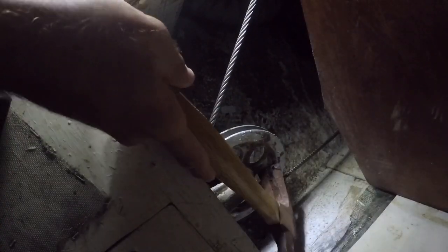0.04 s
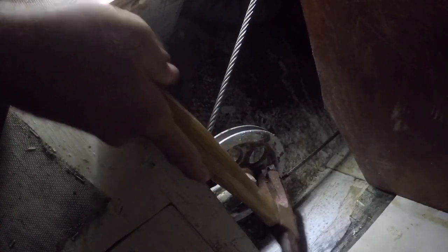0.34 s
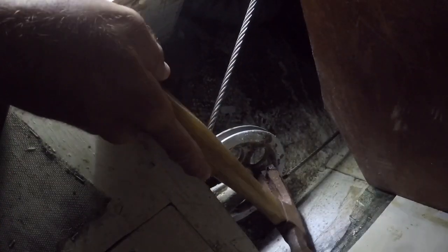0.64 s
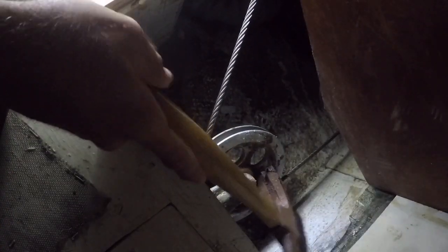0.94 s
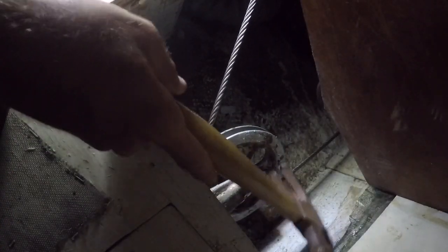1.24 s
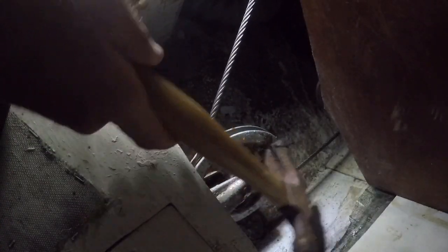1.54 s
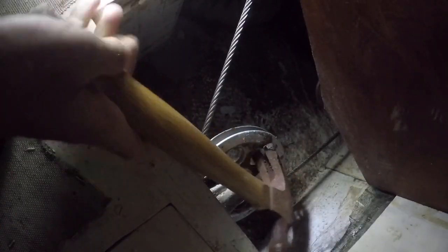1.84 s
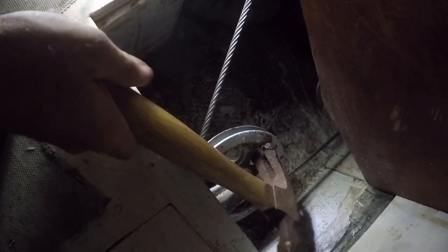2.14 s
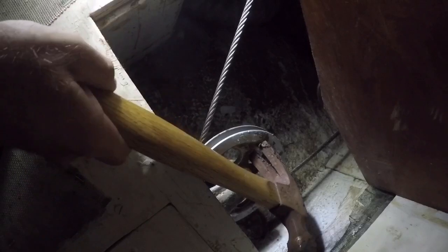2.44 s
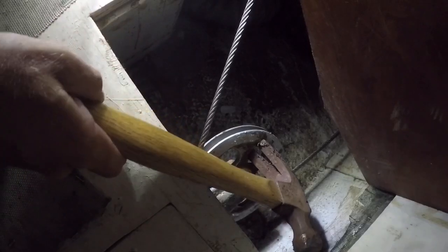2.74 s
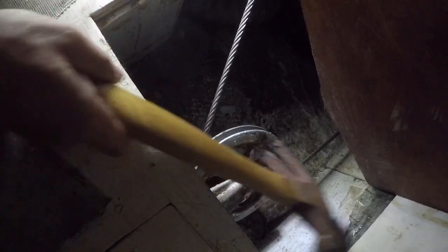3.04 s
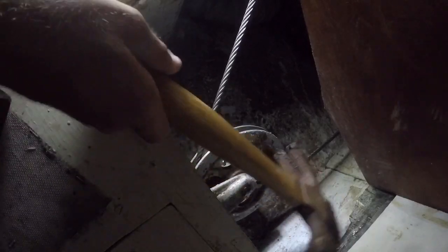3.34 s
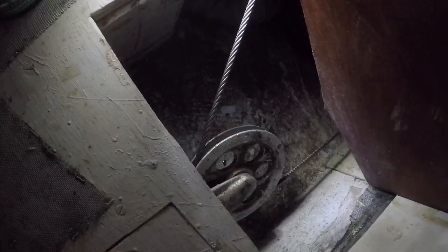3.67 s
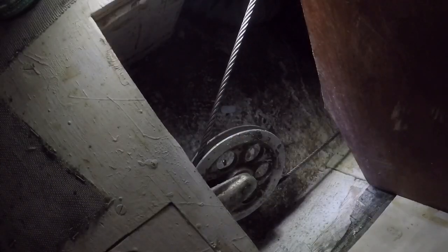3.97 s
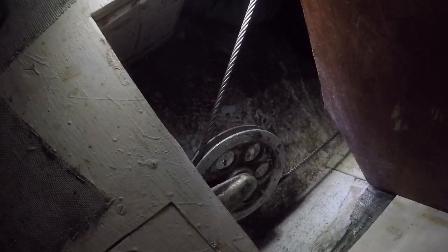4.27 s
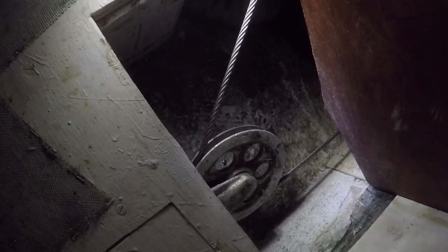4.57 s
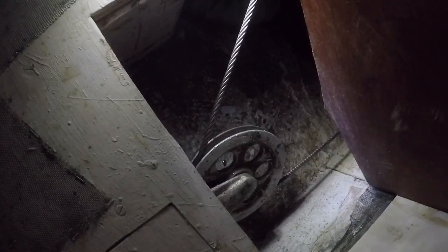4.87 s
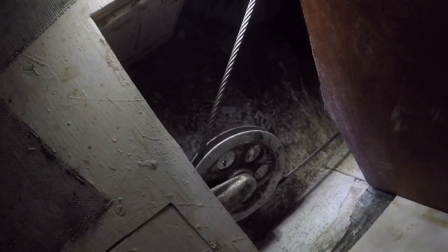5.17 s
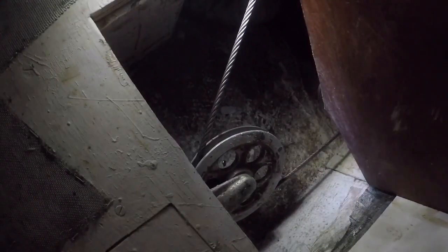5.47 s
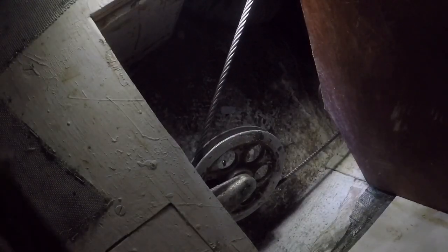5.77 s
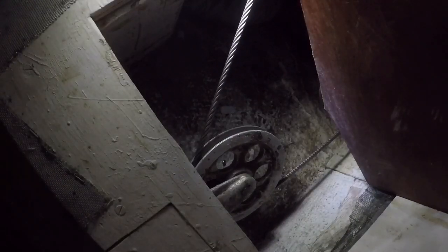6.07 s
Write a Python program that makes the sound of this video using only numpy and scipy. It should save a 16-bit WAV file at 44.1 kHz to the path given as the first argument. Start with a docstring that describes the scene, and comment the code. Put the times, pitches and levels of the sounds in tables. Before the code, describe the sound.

Irregular knocks, clicks and ringing metal clanks as a hammer and steel cable work a pulley below a boat's deck, ending in a wire rasp.

```python
"""Below deck on a boat, a steel steering cable and its pulley are worked close to a small stereo microphone.
Over the soft rumble of the hull, knocks boom in the wooden deck while a hammer is held to the pulley.
A dry contact squeaks by stick-slip, the cable is tugged, the hammer lifts and the sound cuts out briefly.
Then the steel wheel clanks and rings in its modes, amid short pulls, axle creaks and more knocks.
Last comes one long haul, the wire strands rasping over the pulley and shaking the deck."""
import sys
import numpy as np
from scipy import signal
from scipy.fft import rfft, irfft, next_fast_len
from scipy.io import wavfile
from scipy.ndimage import uniform_filter1d

SR = 44100
rng = np.random.default_rng(int(sys.argv[2]) if len(sys.argv) > 2 else 0)


def wav_record(signal):
    """Record a signal, one row per channel, as 16-bit PCM in the file named by sys.argv[1]."""
    frames = np.transpose(np.atleast_2d(signal))
    bounded = np.clip(frames, -1, 1)
    # unit amplitude maps onto the largest positive 16-bit level
    quanta = np.round(bounded * 32767).astype(np.int16)
    wavfile.write(sys.argv[1], SR, quanta)


N = 278271
TIME = np.arange(N) / SR
RING_TIME = TIME[:SR]
TOP_HZ = 15800
HAMMER_LIFTS_S = 3.3

# Modes of the deck and of the pulley mount. Each row: frequency in Hz, level in dB, t60 in seconds.
DECK_MODES = [(151.9, -1.5, 0.23), (185.4, 4.5, 0.092), (233, 4, 0.13)]
MOUNT_MODES = [(308.5, 2, 0.12), (369.3, -10, 0.16)]
# Spectrum of steel striking steel. Each row: frequency in Hz, spectral density in dB.
CRASH_SPECTRUM = [(290, -16), (500, -4), (610, -9.5), (823, -4.5), (962, 2), (1390, -3), (1750, 1),
                  (1960, -11), (3230, -6), (4050, -21), (4290, -20), (6120, -18), (15000, -48.5)]


def undb(db):
    """Decibels to amplitude ratio."""
    return 10 ** (np.asarray(db) / 20)


def unit(x):
    """Normalise to rms 1."""
    return x / np.sqrt(np.mean(x ** 2))


def add(out, s, x):
    """Superposition: mix x in at s seconds."""
    i = int(s * SR)
    out[:, i:i + x.shape[1]] += x[:, :N - i]


def colour(x, points):
    """Zero-phase filtering by a curve of (Hz, dB) points."""
    hz, db = np.transpose(points)
    size = next_fast_len(x.shape[-1])
    f = np.maximum(np.fft.rfftfreq(size, 1 / SR), 1)
    gain = undb(np.interp(np.log(f), np.log(hz), db))
    return irfft(rfft(x, size) * gain, size)[..., :x.shape[-1]]


def noise(points, size):
    """Two uncorrelated coloured noises: the direct sound and its scatter round the bilge."""
    return unit(colour(rng.standard_normal((2, size)), points))


def walk(rate_hz):
    """Smooth random modulation with a spread near 1."""
    k = int(SR / rate_hz)
    steps = np.repeat(rng.standard_normal(N // k + 2), k)
    return 1.1 * uniform_filter1d(uniform_filter1d(steps, k), k)[:N]


def fade(t60, rise, t=RING_TIME):
    """Envelope of a damped vibration: quick rise, exponential decay, both times in seconds."""
    return (1 - np.exp(-t / max(rise, 1 / SR))) * np.exp(-np.log(1000) * t / max(t60, 1 / SR))


def ring(modes, rise, detune, echo_s=0.001037, stray_rad=0.53):
    """Free vibration of modes retuned by the load, direct and reflected off the nearest board."""
    out = 0
    for (hz, db, t60), (load, path) in zip(modes, rng.standard_normal((len(modes), 2))):
        omega = 2 * np.pi * hz * (1 + detune * load)
        phases = [omega * RING_TIME, omega * (RING_TIME - echo_s) + stray_rad * path]
        out = out + undb(db) * fade(t60, rise) * np.sin(phases)
    return out


def burst(points, t60, rise, tail_db, tail_t60):
    """Overlapping modes decay as noise, with a reverberant tail in the bilge."""
    t = RING_TIME[:SR // 2]
    return noise(points, len(t)) * (fade(t60, rise, t) + undb(tail_db) * fade(tail_t60, rise, t))


def peaked(points, hz, boost_db, octaves):
    """Resonance: a hump in the spectrum where a contact rings most."""
    grid = np.geomspace(100, TOP_HZ, num=60)
    known_hz, db = np.transpose(points)
    hump = boost_db * np.exp(-(np.log2(grid / hz) / octaves) ** 2)
    return np.column_stack([grid, np.interp(np.log(grid), np.log(known_hz), db) + hump])


def hardened(points, hz, knee_hz=4800, slope_db=5):
    """Contact stiffness: a harder, higher tick reaches further into the top octaves."""
    tilt_db = slope_db * np.log2(hz / knee_hz)
    return [(f, db + tilt_db * max(np.log2(f / knee_hz), 0)) for f, db in points]


def favoured(modes, centre_hz, db_per_octave):
    """Selective excitation: the spot struck favours the modes near one frequency."""
    return [(hz, db - db_per_octave * abs(np.log2(hz / centre_hz)), t60) for hz, db, t60 in modes]


def slips(per_s=3200, spread_db=3.8):
    """Friction as shot noise: tiny slips of uneven size, direct and scattered."""
    when = rng.random(N) < per_s / SR
    size = undb(spread_db * np.minimum(rng.exponential(size=N), 3))
    return unit(when * size * rng.choice([-1, 1], (2, N)))


def pull(length, build_db, attack_s=0.003, release_t60=0.087):
    """Envelope of sliding friction: it grows as tension builds, then decays on release."""
    t = RING_TIME
    tension_db = build_db * (np.minimum(t / length, 1) - 1)
    release = np.exp(-np.log(1000) * np.maximum(t - length, 0) / release_t60)
    return (1 - np.exp(-t / attack_s)) * undb(tension_db) * release


def rubbed(modes, force):
    """Forced vibration: slips convolved with the impulse response of the modes."""
    response = unit(ring(modes, rise=0.00077, detune=0.0006)) / np.sqrt(SR)
    return signal.fftconvolve(slips()[:1] * force, response, axes=1)[:, :N]


def hull():
    """Modulated noise bands: rumble, hollow murmur and faint hiss; one damped low mode thuds."""
    # Spectrum of the hull. Each row: frequency in Hz, spectral density in dB.
    spectrum = [(12, -37), (20, -3), (87, -5), (328, -15), (398, -26), (571, -25.5), (818, -29),
                (1020, -26.5), (1510, -31.5), (1730, -31.5), (4310, -39.5), (7300, -40.5), (10200, -46),
                (13100, -54.5), (15000, -71)]
    # Contours of rumble and murmur. Each row: time in seconds, relative level in dB.
    rumble_levels = [(0.0, -48.5), (0.84, -38), (1.44, -42.5), (1.67, -35), (2.74, -40.5), (3.22, -41.5),
                     (3.4, -47), (3.47, -70), (3.76, -67), (4.02, -50), (4.59, -53.5), (5.01, -40.5),
                     (6.12, -46.5), (6.31, -40.5)]
    murmur_levels = [(0, -40.5), (1.2, -39), (2.4, -45), (3.3, -42.5), (3.9, -40.5), (4.2, -39.5),
                     (4.9, -41), (5.35, -43.5), (6.31, -42)]
    bands = [signal.butter(4, edges_hz, "bandpass", fs=SR, output="sos")
             for edges_hz in [(18, 110), (125, 650), (650, 15000)]]
    rumble, murmur, hiss = (unit(signal.sosfilt(band, noise(spectrum, N))) for band in bands)
    dip_db = np.interp(TIME, [1.19, 2.19], [8, 0], left=0)  # the hiss dips once and creeps back
    out = (rumble * undb(np.interp(TIME, *np.transpose(rumble_levels)) + 4.5 + 1.96 * walk(14))
           + murmur * undb(np.interp(TIME, *np.transpose(murmur_levels)) + 3 * walk(18))
           + hiss * undb(-53.5 - dip_db + walk(37)))
    thud = ring([(75, -7, 0.071)], rise=0.0052, detune=0.02)
    add(out, 0.8, thud)
    return out


def handling(ticks_per_s=14, spread_db=4, level_db=-50):
    """Random light impacts: the hammer shifts with dry ticks while it is held in place."""
    out = np.zeros((2, N))
    for when, size in rng.random((int(ticks_per_s * HAMMER_LIFTS_S), 2)):
        tick = burst(CRASH_SPECTRUM, 0.067, rise=0.00089, tail_db=-5, tail_t60=0.24)
        add(out, when * HAMMER_LIFTS_S, undb(level_db + spread_db * (2 * size - 1.5)) * tick)
    return out


def creaks(overtone_db_per_octave=-21):
    """Brief slips of the axle sound gliding harmonic notes, broadened by random phase drift."""
    # Each row: centre time in seconds, pitch in Hz, glide in Hz per second, linewidth in Hz,
    # length in seconds, level in dB.
    axle_slips = [(0.345, 5500, 0, 380, 0.024, -43), (0.463, 1140, -4, 19, 0.016, -40),
                  (0.729, 1470, 0, 400, 0.012, -42), (1.041, 1170, 30000, 320, 0.0088, -32),
                  (1.542, 1144, 0, 710, 0.016, -32.5), (3.96, 973, -900, 10, 0.015, -21),
                  (4.109, 967, -900, 13, 0.022, -21.5), (4.84, 607, 12996, 81, 0.023, -33),
                  (5.06, 553, 8000, 170, 0.032, -42.5), (5.206, 1013, -4000, 18, 0.018, -37),
                  (5.228, 1214, 7000, 140, 0.019, -44), (6.2, 4370, -2, 160, 0.019, -39)]
    out = np.zeros((2, N))
    for s, hz, glide, width_hz, length, db in axle_slips:
        t = np.arange(-2 * length, 2 * length, 1 / SR)
        drift = np.cumsum(rng.standard_normal(len(t))) * np.sqrt(np.pi * width_hz / SR)
        phase = 2 * np.pi * (hz + glide * t / 2) * t + uniform_filter1d(drift, size=24)
        note = sum(undb(overtone_db_per_octave * np.log2(k)) * np.sin([k * phase, k * (phase + 1)])
                   for k in range(1, 4))
        add(out, s - 2 * length, undb(db) * np.exp(-2 * (t / length) ** 2) * note)
    return out


def scrapes():
    """Sliding friction: the hammer head rasps dryly on the rim."""
    # Each row: start in seconds, length in seconds, final level in dB, build-up in dB.
    slides = [(0.308, 0.011, -40, 10), (1.047, 0.032, -36, 4), (1.084, 0.018, -26, 4),
              (2.332, 0.019, -39, 8)]
    # Spectrum of the rasp. Each row: frequency in Hz, spectral density in dB.
    spectrum = [(300, -5), (450, -7), (590, 8.5), (720, -9), (1100, -1), (2300, -2.5), (3300, 1.5),
                (5800, -2), (7500, -6), (9500, -18), (11500, -24), (15000, -30)]
    force = np.zeros((1, N))
    for start, length, db, build_db in slides:
        add(force, start, undb([[db]]) * pull(length, build_db))
    return force * unit(colour(slips(), spectrum))


def squeak(smooth_hz=2500, jitter=0.027, attack_s=0.0054, release_s=0.062):
    """Stick-slip oscillation: as the rubbing slows, the pitch sinks and the note grows rough."""
    # Pitch contour. Each row: time in seconds, slip rate in Hz.
    slip_rates = [(2.68, 2740), (2.692, 2690), (2.706, 2900), (2.716, 2650), (2.724, 2330), (2.741, 2050),
                  (2.752, 2130), (2.762, 2400), (2.774, 2480), (2.797, 1690), (2.83, 1000), (2.86, 750)]
    # Response of the rubbed body. Each row: frequency in Hz, gain in dB.
    body = [(500, -8), (1100, 8), (2300, 0), (3600, 4.5), (4300, 2.5), (5000, -4), (5400, 6.5), (5800, -11),
            (6250, 10.5), (6900, 3.5), (7500, -12), (8200, -4.5), (8700, -15), (14000, -54)]
    s, hz = np.transpose(slip_rates)
    rate = np.interp(TIME, s, hz)
    rough = (smooth_hz / rate) ** 2
    phase = 2 * np.pi * np.cumsum(rate * (1 + jitter * rough * walk(900))) / SR
    harmonics = sum(np.sin([k * phase, k * (phase + 1)]) * (k * rate < TOP_HZ) for k in range(1, 8))
    rasp = undb(-11.5) * np.minimum(rough, 3) * noise(body, N)
    envelope = np.clip((TIME - s[0]) / attack_s, 0, 1) * np.clip((s[-1] - TIME) / release_s, 0, 1) ** 2
    return (colour(harmonics, body) + rasp) * envelope * undb(-40.5 + 4.2 * walk(230))


def bracket():
    """Impulse response: a square blow leaves the pulley's bracket ringing with a hollow clonk."""
    # Each row: start in seconds, level in dB.
    blows = [(0.7713, -19), (1.88, -24)]
    # Each row: frequency in Hz, level in dB, t60 in seconds.
    modes = [(308.6, -6, 0.28), (457, -3, 0.15), (647, 4.5, 0.087), (1080, -9, 0.14), (1630, -26, 0.31)]
    out = np.zeros((2, N))
    for s, db in blows:
        add(out, s, undb(db) * ring(modes, rise=0.00072, detune=0.0018))
    return out


def knocks(cut_hz=122):
    """Impact excitation: each contact ticks and clacks, and drives the modes of mount, boards and deck."""
    # Each row: start in seconds, deck level in dB and centre in Hz, mount level in dB,
    # clack level in dB and centre in Hz, tick level in dB and centre in Hz. Levels are relative.
    blows = [(0.319, -22.5, 227, -23, -20, 560, -37, 3180),
             (0.329, -16.5, 202, -21.5, -16.5, 526, -36, 2200),
             (0.378, -27.5, 174, -37, -34, 500, -45.5, 2900),
             (0.77, -28, 167, -24.5, -18, 526, -43.5, 4050), (0.796, -30.5, 157, -30, -32, 660, -68, 2500),
             (0.9835, -43, 176, -36, -31, 990, -31.5, 5370), (0.987, -20, 173, -30, -18.5, 600, -32, 2760),
             (1.1651, -16, 213, -15, -17, 800, -28.5, 3430),
             (1.237, -26, 200, -21, -28.5, 755, -51.5, 4070),
             (1.3, -24, 171, -17.5, -28.5, 455, -45.5, 5300), (1.458, -21, 160, -17, -20.5, 560, -32, 4700),
             (1.558, -19, 145, -17.5, -23, 750, -35.5, 5170), (1.602, -21, 149, -22, -29.5, 660, -45, 5200),
             (1.623, -33, 160, -30, -26.5, 520, -43, 5400), (1.649, -24, 168, -20, -25, 1030, -45.5, 4360),
             (1.707, -30.5, 163, -45, -59, 1600, -53, 4200),
             (1.855, -17.5, 174, -24, -17.5, 750, -43, 1700),
             (1.878, -18.5, 158, -22.5, -16, 1400, -37, 2000),
             (1.887, -18.5, 161, -23.5, -15.5, 710, -37, 4130), (1.964, -30, 206, -45, -24, 665, -55, 2220),
             (2.349, -21.5, 170, -29, -26.5, 574, -45, 4020),
             (2.364, -24.5, 163, -36, -35, 543, -29.5, 6400), (2.42, -30, 198, -43, -30.5, 660, -25, 6800),
             (3.4837, -28, 215, -38, -48, 1700, -23.5, 5100), (3.519, -16, 161, -30, -27.5, 990, -20, 7800),
             (4.017, -40, 240, -35, -45, 506, -64, 2410), (4.457, -28, 152, -53, -50, 910, -59, 2500),
             (4.6315, -13, 187, -29, -26, 820, -25, 4250), (4.6717, -26, 171, -35, -31, 1300, -30.5, 4620),
             (4.674, -13, 184, -20.5, -24, 516, -31, 3500), (4.7246, -18.5, 197, -32, -38, 576, -37, 1700),
             (4.746, -29, 186, -36, -37, 1600, -28.5, 4170),
             (4.7549, -14.5, 174.5, -27, -34.5, 570, -30, 3000),
             (4.794, -29, 163, -32, -38.5, 1610, -38, 1750),
             (4.823, -32, 186, -36, -39.5, 1650, -36.5, 1700),
             (5.54, -28, 173, -43, -30.5, 1730, -12.5, 5900),
             (5.559, -43, 179, -45, -36, 1750, -16.5, 9800),
             (5.59, -23.5, 160, -24, -26.5, 1070, -18, 4630), (5.627, -28, 174, -39, -35, 1100, -33, 3400),
             (5.644, -30, 176, -44, -26.5, 1140, -13, 7200),
             (5.6534, -14.5, 184.6, -34, -45, 1100, -11.5, 3400),
             (5.6865, -29, 172, -37, -29.5, 1100, -23.5, 7400),
             (5.709, -20.5, 217, -23, -25.5, 1140, -18, 2600),
             (5.719, -26, 200, -32, -30.5, 1200, -20, 6900), (5.876, -34, 180, -43, -37, 1750, -27, 5500),
             (6.009, -55, 238, -64, -48, 1020, -36.5, 2560),
             (6.059, -37.5, 173, -53, -60, 1000, -44.5, 5700),
             (6.194, -47, 181, -61, -52, 1010, -34.5, 4280)]
    # Spectra of the hard tick and wooden clack. Each row: frequency in Hz, spectral density in dB.
    tick_spectrum = [(700, -20), (1700, -2.5), (3300, 5), (4600, 0), (5600, 4.5), (7200, -1), (9000, -10),
                     (12000, -18.5), (16000, -30)]
    clack_spectrum = [(200, -16), (400, 9.5), (520, -1), (680, -6.5), (850, -13), (1050, -0.5), (1380, -13),
                      (1700, -10.5), (2600, -17), (6000, -62)]
    # Hollow notes of the boards, and the deck's first shove.
    # Each row: frequency in Hz, level in dB, t60 in seconds.
    board_modes = [(453, -1, 0.12), (527, 3.5, 0.076), (668, -4, 0.052), (742, -5.5, 0.075),
                   (980, -8.5, 0.11), (987, -11, 0.039), (1110, -5, 0.062), (1260, -12, 0.062),
                   (1560, 0.5, 0.062), (1834, 4, 0.032), (2135, 1, 0.04), (2530, 1, 0.051)]
    shove_modes = [(276, 0, 0.019), (428, -6.5, 0.015)]
    out = np.zeros((2, N))
    for s, deck_db, deck_hz, mount_db, clack_db, clack_hz, tick_db, tick_hz in blows:
        # the resting hammer damps the clack and leaves no tail
        tick_t60, clack_t60, tail_t60 = (0.043, 0.0151, 0) if s < HAMMER_LIFTS_S else (0.0084, 0.19, 0.22)
        tick = hardened(peaked(tick_spectrum, tick_hz, boost_db=9, octaves=0.22), tick_hz)
        clack = peaked(clack_spectrum, clack_hz, boost_db=7, octaves=0.46)
        boards = favoured(board_modes, clack_hz, db_per_octave=11)
        deck = favoured(DECK_MODES, deck_hz, db_per_octave=22)
        tail = dict(tail_db=-15, tail_t60=tail_t60)
        add(out, s, undb(tick_db + 5) * burst(tick, tick_t60, rise=0.00037, **tail))
        add(out, s, undb(clack_db + 3.5) * burst(clack, clack_t60, rise=0.00083, **tail))
        add(out, s, undb(clack_db) * ring(boards, rise=0.0013, detune=0.033))
        add(out, s + 0.0012, undb(mount_db + 8) * ring(MOUNT_MODES, rise=0.0073, detune=0.04))
        add(out, s + 0.00094, undb(deck_db + 6.5) * ring(shove_modes, rise=0.00063, detune=0.032))
        add(out, s + 0.0019, undb(deck_db + 6.5) * ring(deck, rise=0.0033, detune=0.05))
    # the knocks carry little deep bass
    return signal.sosfilt(signal.butter(5, cut_hz, "highpass", fs=SR, output="sos"), out)


def clanks():
    """Modal ringing of struck steel: a crash, a groove note and a ring weighted by the point of impact."""
    # Each row: start in seconds, relative groove and wheel levels in dB, place from 0 (rim)
    # to 1 (groove), crash level in dB, crash t60 in seconds.
    blows = [(3.4831, -25, -23.5, 0.24, -18.5, 0.26), (3.519, -24, -24.5, 0.085, -33, 0.34),
             (3.827, -24.5, -33, 0.79, -34.5, 0.09), (3.844, -21.5, -28, 1, -29, 0.17),
             (3.945, -30, -42.5, 0.97, -41.5, 0.46), (4.094, -23.5, -41, 0.98, -38, 0.25),
             (4.163, -29.5, -40.5, 0.42, -42, 0.18), (4.223, -29, -41, 0.3, -50, 0.12),
             (4.271, -52, -43.5, 0.28, -43, 0.092), (4.33, -46, -64, 0.99, -35.5, 0.042),
             (4.3627, -25, -33.5, 0.73, -29.5, 0.12), (4.436, -53, -59, 0.16, -40, 0.074)]
    # Each row: frequency in Hz, t60 in seconds, levels in dB when struck on the rim and in the groove.
    wheel_modes = [(774, .35, -4, -12), (1063, .5, -9, -11), (1138, .28, -1, -7), (1236, .3, 1, -10),
                   (1329, .6, -9, -11), (1385, .12, -4, 1), (1617, .2, -6, -1), (1706, .52, 2.5, -9),
                   (1730, .3, 0, -10), (1800, .12, 2, -8), (1950, .12, -4, -4), (2080, .25, 0, -6),
                   (2121, .33, -14, -2), (2331, .3, -16, 0), (2466, .3, -3, -14), (2545, .7, -4.5, -22),
                   (2620, .4, -18, -14), (2799, .44, -11, -18), (2904, .85, -10, -20), (3122, .6, -11, -16),
                   (3250, .42, -8, -13), (3318, .42, -5, -15), (3375, .48, -5, -17), (3510, .24, -4, -9),
                   (3580, .2, -10, -3), (3838, .68, -9, -25), (3892, .22, -16, -11), (4145, .2, -16, -12),
                   (4280, .7, -17, -25), (4360, .22, -5, -14), (4430, .23, -7, -9), (4770, .25, -6, -17),
                   (4985, .28, -13, -23), (5340, .18, -9, -10), (5540, .26, -9, -11), (5712, .32, -13, -21),
                   (6050, .25, -11, -20), (6240, .25, -10, -21)]
    # Each row: frequency in Hz, level in dB, t60 in seconds.
    groove_modes = [(940, -7, 0.1), (972, 1.5, 0.19), (998, -3, 0.11), (1065, -10, 0.14)]
    out = np.zeros((2, N))
    for s, groove_db, wheel_db, place, crash_db, crash_t60 in blows:
        modes = [(hz, np.interp(place, [0, 1], [rim, groove]), t60) for hz, t60, rim, groove in wheel_modes]
        add(out, s, undb(crash_db) * burst(CRASH_SPECTRUM, crash_t60, rise=0.00079, tail_db=-13, tail_t60=0.4))
        add(out, s, undb(groove_db - 2) * ring(groove_modes, rise=0.0043, detune=0.012))
        add(out, s, undb(wheel_db - 4) * ring(modes, rise=0.005, detune=0.00035))
    return out


def cable(chatter_db=3.3):
    """Frictional excitation: wire strands catch and slip, driving the guide, pulley and deck."""
    # The long haul. Each row: time in seconds, then relative levels in dB of strands, pulley and deck.
    haul = [(5.37, -61, -57, -58), (5.42, -53.5, -54, -38), (5.49, -53.5, -48, -31),
            (5.527, -32.5, -36.5, -42), (5.549, -24.5, -31, -29), (5.58, -32.5, -35, -22),
            (5.61, -22.5, -30, -23.5), (5.655, -19.5, -27, -23), (5.678, -41, -45, -27),
            (5.703, -26, -31, -26.5), (5.724, -22, -23, -21.5), (5.768, -36, -42, -35),
            (5.848, -28.5, -50, -43), (5.868, -31.5, -43, -47), (5.884, -23.5, -41, -32.5),
            (5.936, -31.5, -47, -33.5), (5.968, -49, -61, -50), (6.0, -80, -72, -64)]
    # Each row: start and length in seconds, final level in dB, build-up in dB,
    # guide level relative to the strands in dB, deck level in dB.
    short_pulls = [(2.957, 0.018, -42, 10, -7, -27), (4.141, 0.07, -51, -0.5, 3.5, -39),
                   (4.245, 0.075, -44.5, 6, -1, -53)]
    # Each row: frequency in Hz, spectral density in dB.
    strand_spectrum = [(120, -41), (200, -19), (340, 5.5), (450, 0.5), (620, -7.5), (820, -8.5),
                       (1000, 0.5), (1450, -4.5), (1780, 5.5), (2150, -2.5), (3400, 1), (4150, -2.5),
                       (5100, -4.5), (5700, -1.5), (7400, -5.5), (10000, -10.5), (15000, -27)]
    # Modes of the cable guide and low modes of the pulley.
    # Each row: frequency in Hz, level in dB, t60 in seconds.
    guide_modes = [(1590, -5, .06), (1720, 3, .09), (1790, 3, .07), (1900, -2, .06), (2130, -3, .07),
                   (2375, -3, .06), (2692, -2, .09), (3114, -1, .09), (3320, -2, .08), (3510, -3, .06),
                   (3714, -3, .06), (3895, -4, .06), (4447, -2.5, .09), (4750, -4, .06), (5500, 0, .07),
                   (5620, -3, .05), (5846, -1, .1), (6029, -1, .08), (6220, -4, .05), (6691, -2, .05),
                   (7240, -2, .05), (7780, -5, .06), (8650, -9, .06), (9700, -10, .05)]
    pulley_modes = [(978, 1, .11), (1034, -4, .08), (1112, 0, .13), (1231, -5, .09)]
    s, *levels = np.transpose(haul)
    rub, pulley, shake = (undb(np.interp(TIME, s, db, left=-120, right=-120)) for db in levels)
    force = np.array([rub * undb(-1.5), rub * undb(-1.5), shake])  # on strands, guide and deck
    for start, length, db, build_db, ring_db, deck_db in short_pulls:
        add(force, start, undb([[db], [db + ring_db], [deck_db]]) * pull(length, build_db))
    strands, guide, deck = force * undb(chatter_db * walk(102))
    rasp = strands * unit(colour(slips(), strand_spectrum))
    return (rasp + rubbed(guide_modes, guide) + rubbed(pulley_modes, pulley)
            + rubbed(DECK_MODES + MOUNT_MODES, deck))


def microphone(sound, lean, focus):
    """Two close ports: their difference is in quadrature with the sum, and incoherent in the treble."""
    # Stereo width. Each row: frequency in Hz, side minus mid level in dB.
    width = [(30, -30), (70, -13), (120, -14), (200, 2.5), (350, 4), (650, 9.5), (1100, 4), (2400, -1),
             (4400, -6.5), (8100, 2), (15000, -1.5)]
    direct, scatter = sound
    quadrature = np.imag(signal.hilbert(direct, next_fast_len(N)))[:N]
    aimed = focus * quadrature + np.sqrt(1 - focus ** 2) * scatter
    side = colour(scatter + colour(aimed - scatter, [(1500, -4), (5000, -30)]), width)
    half_lean = np.array(lean) * [1, .5]
    return np.array([colour(direct + side, half_lean), colour(direct - side, half_lean * [1, -1])])


def scene():
    """Direct and diffuse fields: near sources arrive from one direction, the hull from all round."""
    # Stereo balance; the knocks sit further left. Each row: frequency in Hz, left minus right in dB.
    knock_lean = [(100, -3), (300, 2), (550, 7.5), (1000, 1), (2000, 2), (4000, 1), (8000, 1)]
    lean = [(100, -0.5), (300, 0), (520, 4.5), (1000, -2), (2000, 1), (4000, -1), (8000, -1)]
    return (microphone(knocks() + bracket() + scrapes() + handling() + squeak(), knock_lean, focus=0.99)
            + microphone(clanks() + cable() + creaks(), lean, focus=1.0)
            + microphone(hull(), lean, focus=0.33))


def record(dry):
    """Clipping and band limiting: the sound drops out for a moment, peaks held at full scale, the top cut."""
    # The silent gap: start and end in seconds.
    gap = (3.409, 3.462)
    live = (TIME < gap[0]) | (TIME > gap[1])
    gate = uniform_filter1d(1. * live, size=128)
    lowpass = signal.ellip(8, .2, 70, TOP_HZ, fs=SR, output="sos")
    return signal.sosfilt(lowpass, np.clip(dry * gate, -1, 1))


dry = scene()
out = record(dry)
wav_record(out)
```